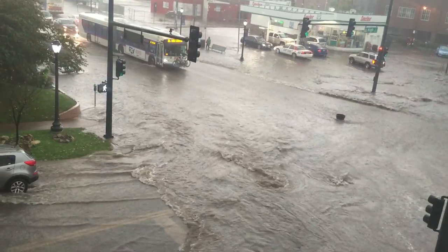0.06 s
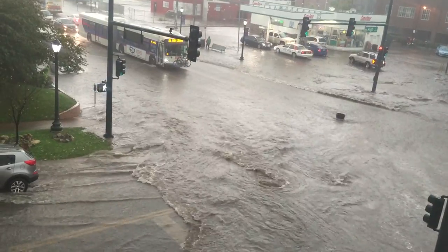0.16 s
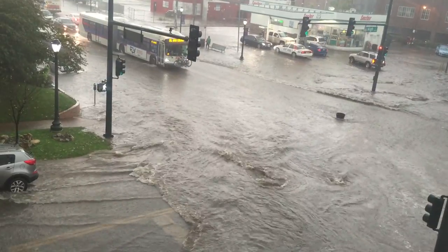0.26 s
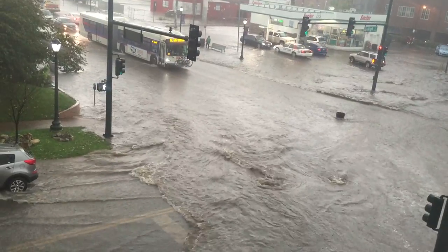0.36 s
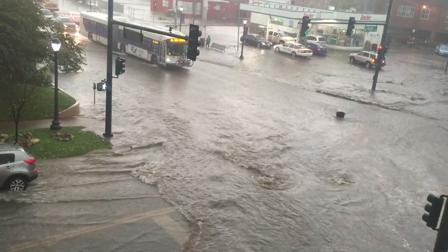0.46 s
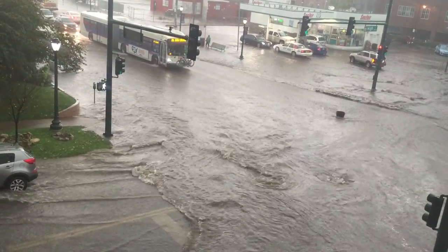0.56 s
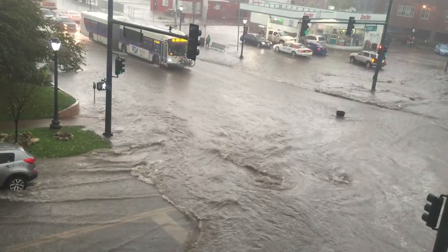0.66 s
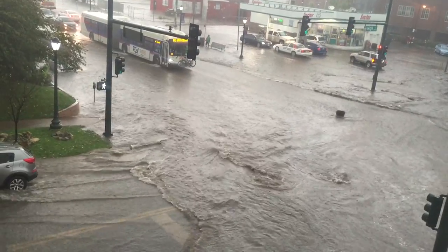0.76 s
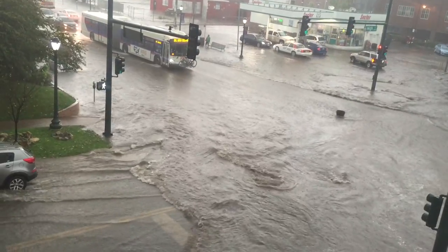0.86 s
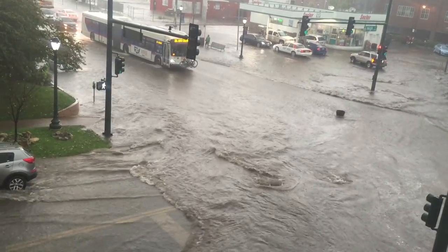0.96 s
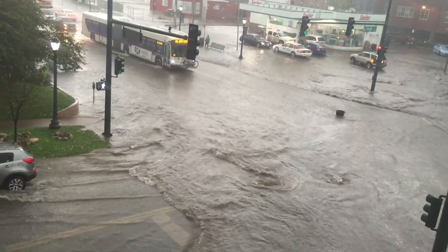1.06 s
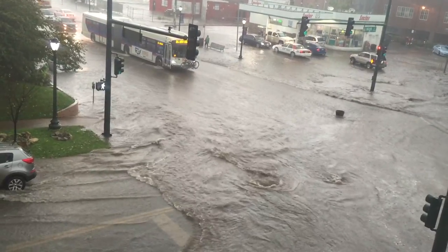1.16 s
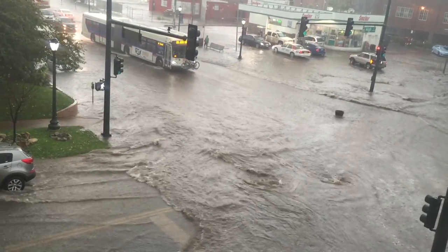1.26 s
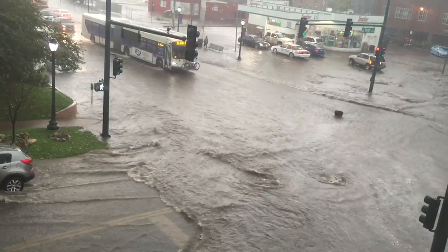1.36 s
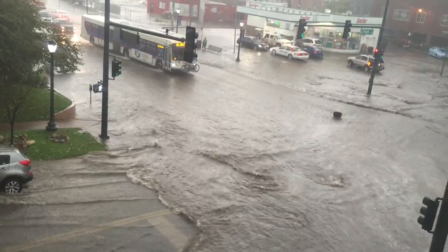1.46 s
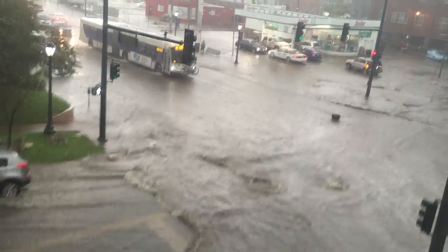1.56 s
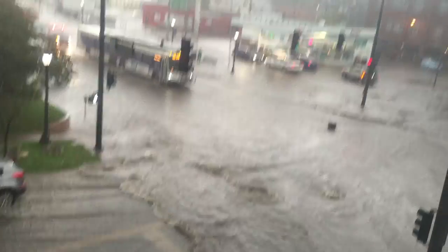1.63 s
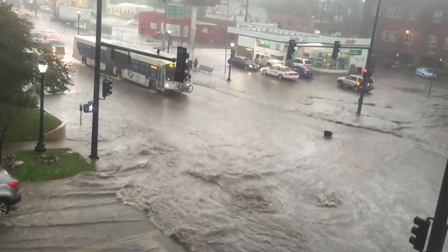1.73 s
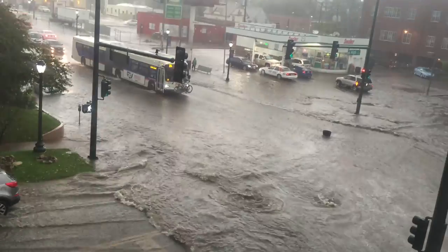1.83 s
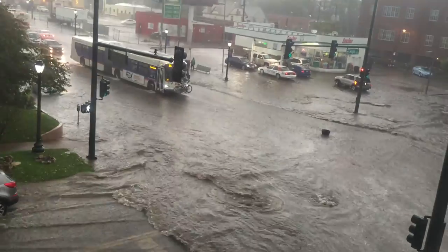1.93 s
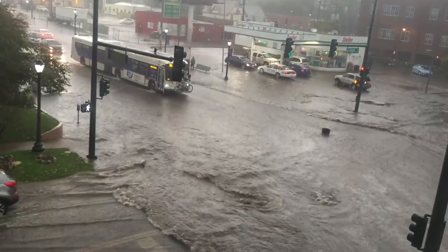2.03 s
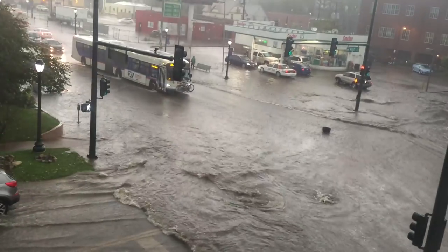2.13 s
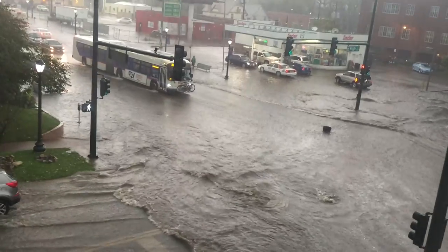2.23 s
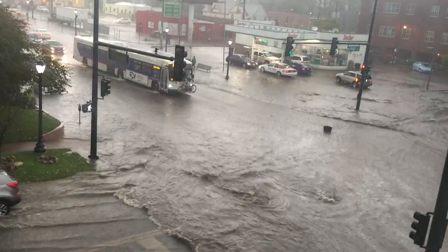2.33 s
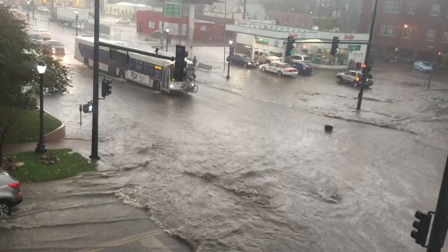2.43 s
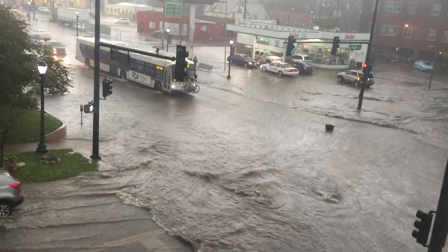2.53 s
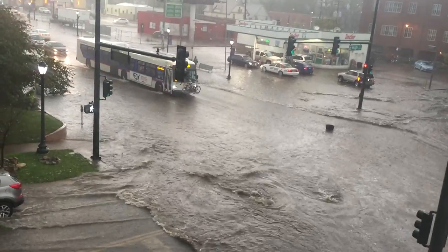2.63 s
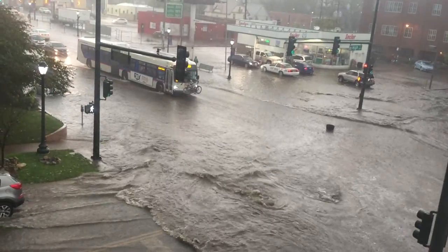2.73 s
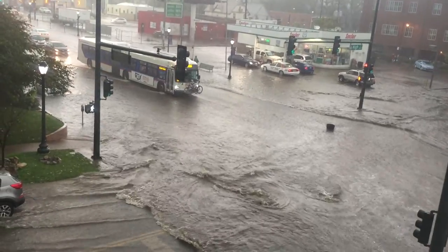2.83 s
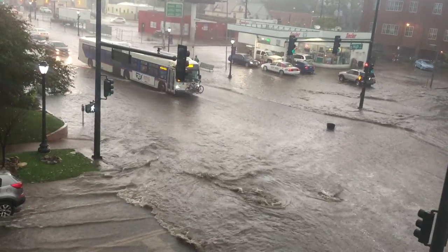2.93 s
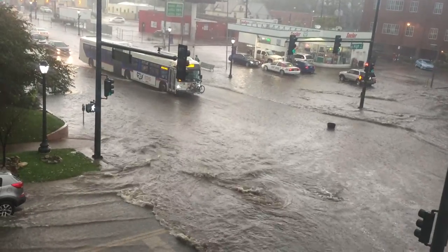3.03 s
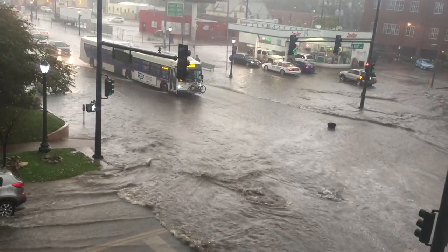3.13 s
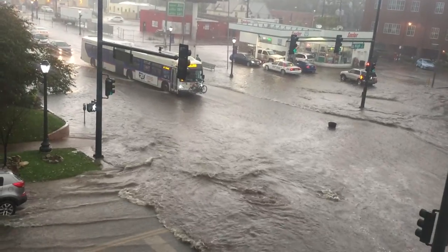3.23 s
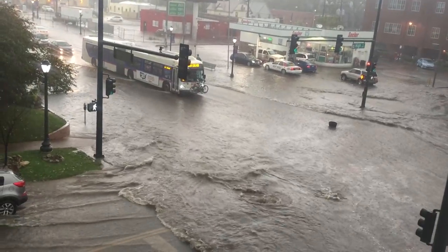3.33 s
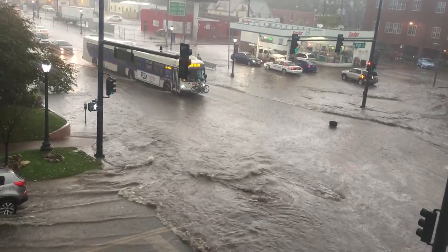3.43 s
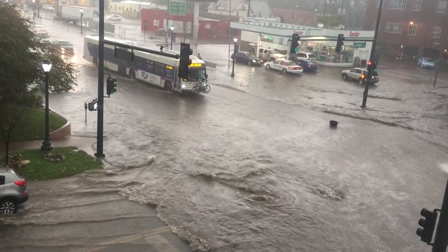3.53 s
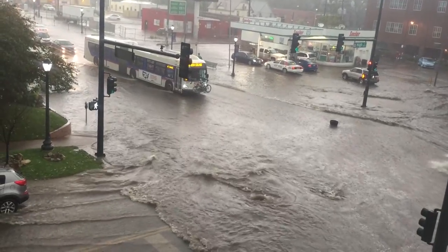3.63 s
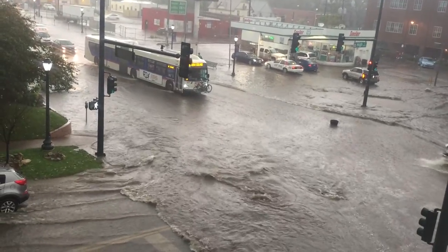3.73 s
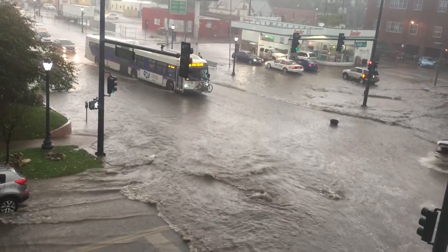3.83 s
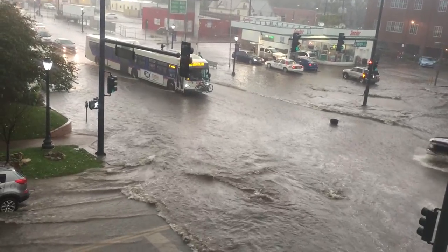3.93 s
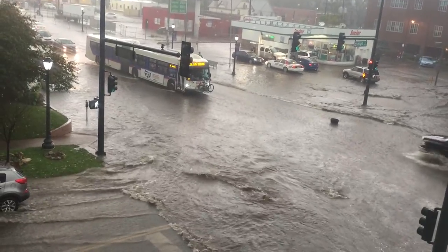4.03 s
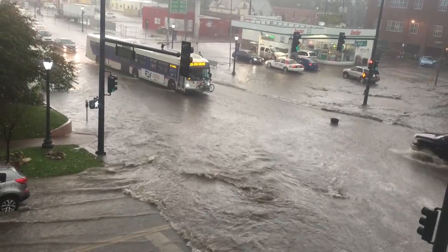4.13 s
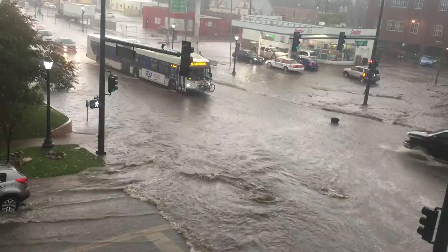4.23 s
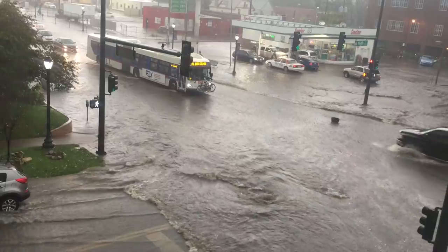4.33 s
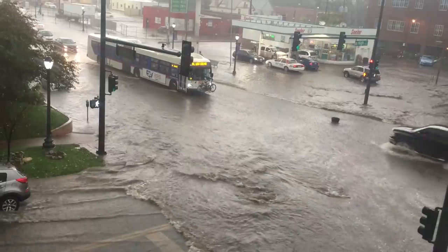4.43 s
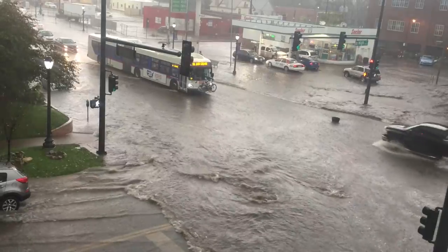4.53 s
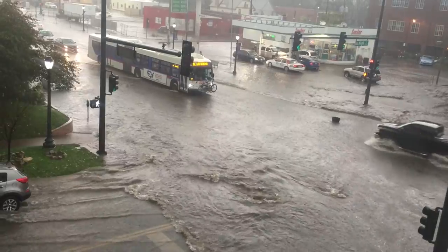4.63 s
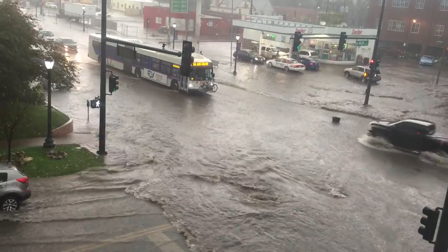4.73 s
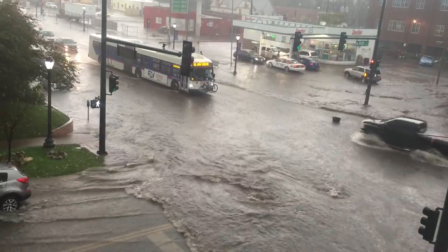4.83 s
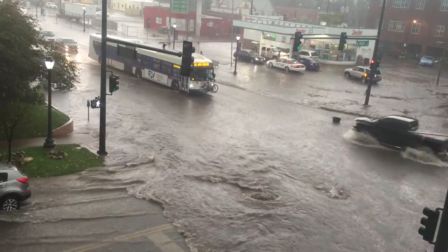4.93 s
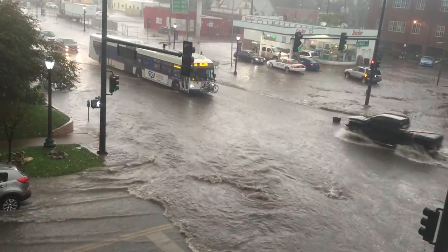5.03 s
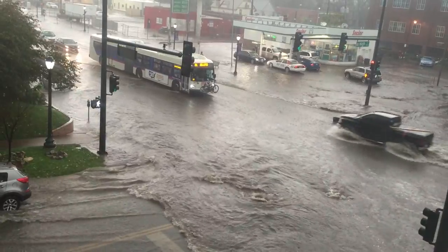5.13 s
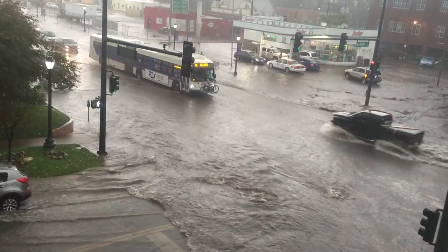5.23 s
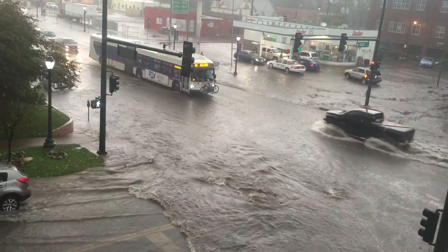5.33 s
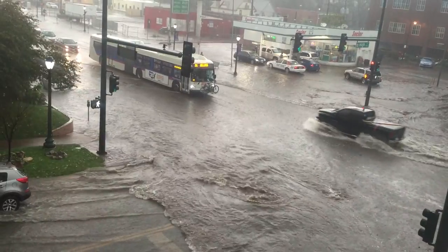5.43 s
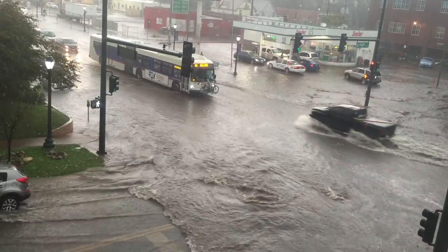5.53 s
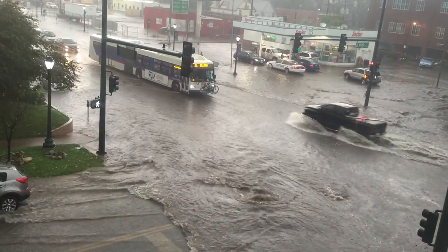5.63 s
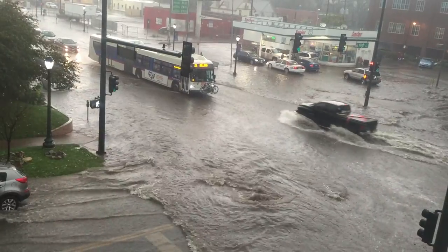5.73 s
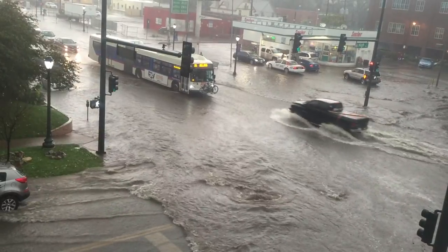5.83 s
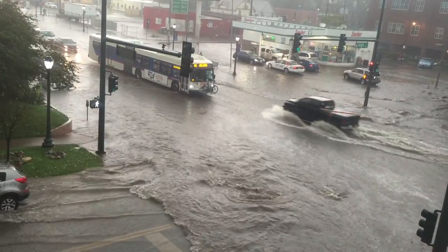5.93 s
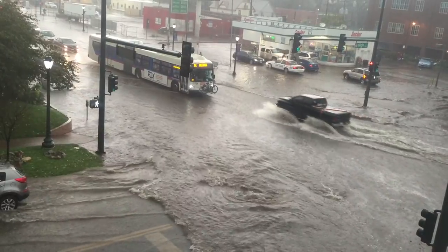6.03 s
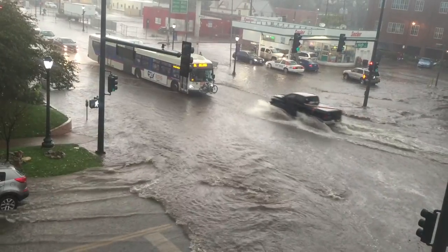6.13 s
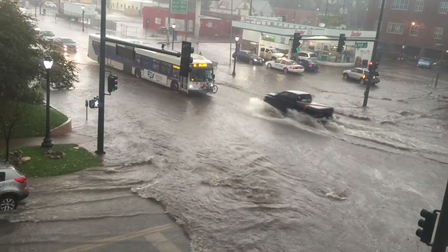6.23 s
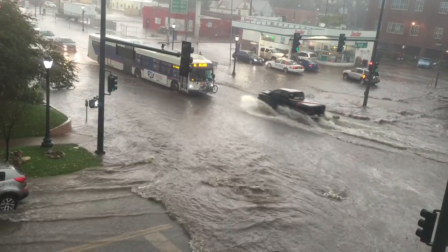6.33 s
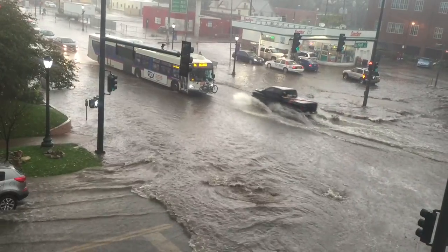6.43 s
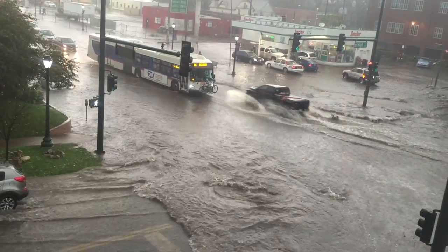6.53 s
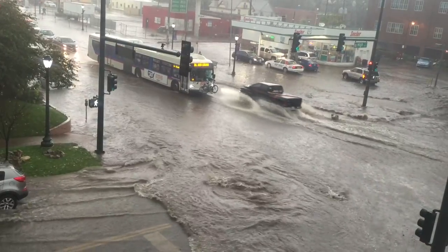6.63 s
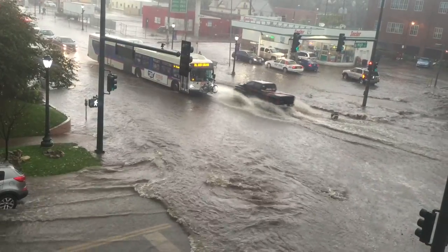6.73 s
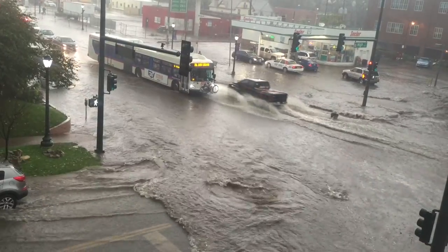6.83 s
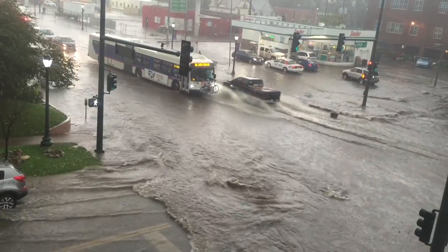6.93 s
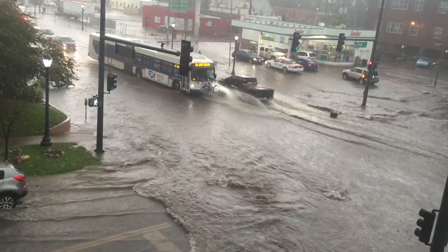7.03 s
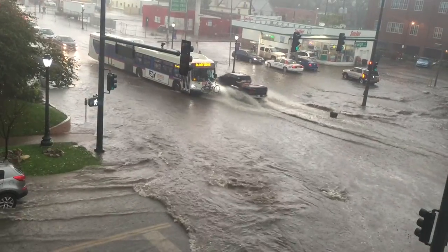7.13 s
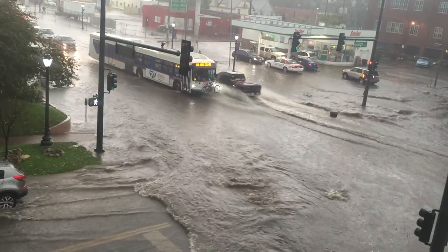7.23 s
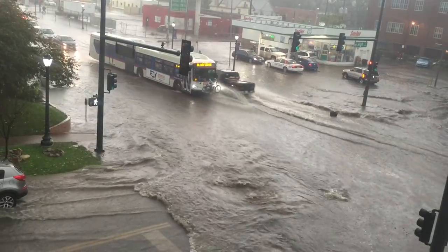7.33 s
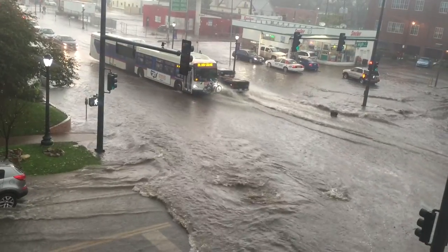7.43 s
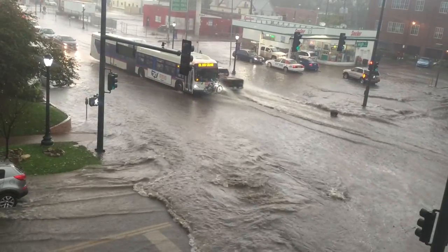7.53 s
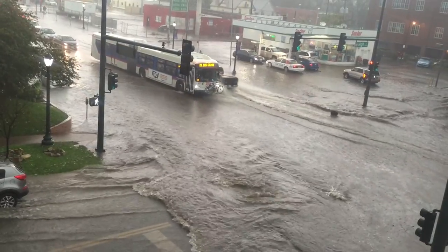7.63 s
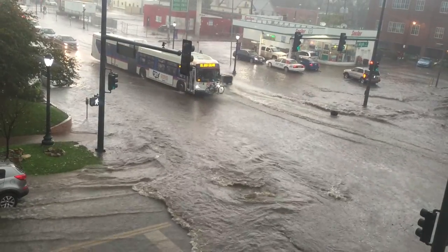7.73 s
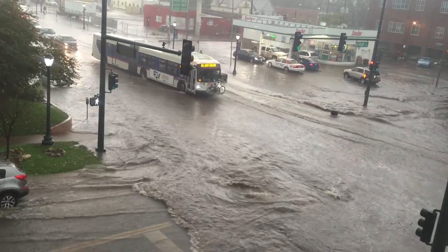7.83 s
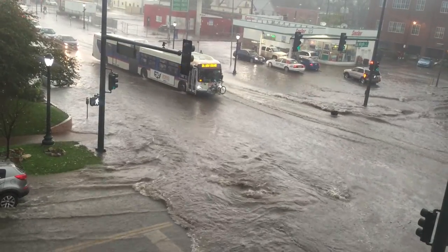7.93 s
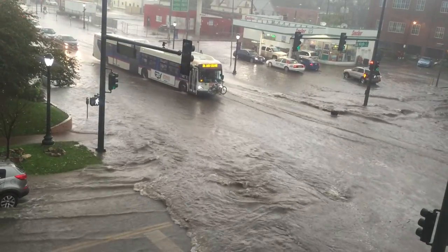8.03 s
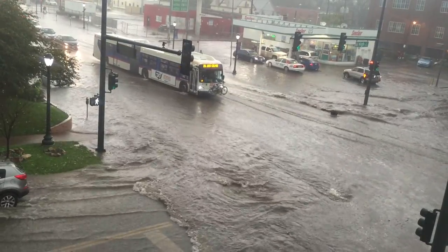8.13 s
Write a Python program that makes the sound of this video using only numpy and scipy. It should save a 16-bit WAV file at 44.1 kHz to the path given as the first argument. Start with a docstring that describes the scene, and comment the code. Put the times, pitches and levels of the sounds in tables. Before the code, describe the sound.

From a sheltered window above a flooded crossing, one microphone with a slightly boxy colour picks up steady rushing water, softer fine rain hiss and uneven low traffic rumble throughout. A pickup's deep, uneven eight-cylinder exhaust emerges around 0.6 s, rises slowly in pitch to about 2.1 s, wavering and burbling, then falls and almost disappears between 3 and 4 s. Here water, rumble and small high drips near 3-3.8 s are clearer. The engine returns at about 4.5 s, climbs steadily, jumps in pitch near 6 s and holds a fuller, faintly raspy roar until 7 s, with soft bubbling spray swelling around 5.7 s and fading. A lower plop lands at 7.0 s. Pitch drops sharply near 7.4 s, followed by a short growl that fades by 8 s. Sparse ticks, a distant idling bus and a very faint thin whine sit behind.

```python
"""An eight-cylinder pickup revs up twice on a flooded crossing in heavy rain, taken from a sheltered window above.
Its exhaust is sines on multiples of the engine cycle, with a band of noise for rasp; its spray is ringing bubbles.
Close by, short noise bursts tick and decaying sines plop; near rain is hiss grained with narrow bands of noise.
Running water is hiss mixed with bubbles. Further off a bus idles on two low sines, a thin whine hangs in the hiss,
and traffic rumbles as lumpy noise. A single microphone in the window recess colours it all."""
import sys
import numpy as np
from scipy import signal
from scipy.fft import rfft, irfft, next_fast_len
from scipy.io import wavfile

SR = 44100
rng = np.random.default_rng(int(sys.argv[2]) if len(sys.argv) > 2 else 0)


def log_audio(samples):
    """Write samples as a 16-bit WAV file to the path given in sys.argv[1]."""
    # one column per channel
    frames = np.atleast_2d(samples).T
    # limit to full scale, then quantise
    limited = np.clip(frames, -1, 1)
    pcm = np.round(limited * 32767).astype(np.int16)
    wavfile.write(sys.argv[1], SR, pcm)


N = 360738   # samples

# All source levels are those ahead of the recess and microphone colour.
# Pickup engine speed: time_s, engine cycles per s
ENGINE_SPEED = [(0, 14.3), (.4, 14.4), (.6, 14.75), (1.0, 14.8), (1.4, 15.85), (1.75, 16.1), (2.1, 16.65),
                (2.7, 16.25), (3.3, 14.3), (4.0, 12.9), (4.45, 13.1), (4.7, 15.0), (4.9, 15.5), (5.1, 15.8),
                (5.65, 16.35), (6.03, 18.4), (6.33, 18.9), (6.6, 18.3), (6.9, 18.45), (7.1, 17.95),
                (7.33, 17.5), (7.48, 15.2), (7.7, 15.8), (8.18, 15.7)]
# Strong exhaust tones: time_s, order_8_db (the firing), order_5_db, order_7_db, before dips and flutter
STRONG_TONES = [(0, -39.5, -46, -43), (.3, -54, -48, -58), (.42, -39.5, -50, -34), (.66, -29.5, -44, -49),
                (1.15, -28, -55, -41), (1.45, -29.5, -50, -40), (1.68, -29, -41, -41),
                (1.83, -41, -38.5, -62), (2.1, -38.5, -45, -36), (2.3, -43, -42, -36.5),
                (2.6, -37.5, -44, -43), (2.95, -67, -45, -52), (3.9, -50, -54, -56), (4.2, -41, -54, -49),
                (4.45, -37.5, -49, -38), (4.62, -28.5, -59, -40), (4.8, -31, -41, -40),
                (5.03, -35.5, -36.5, -36), (5.4, -28.5, -34.5, -39), (5.73, -30.5, -34.5, -44),
                (5.95, -39, -28, -38), (6.25, -45, -30, -39.5), (6.5, -36.5, -29.5, -46),
                (6.8, -42, -26.5, -63), (7.0, -38, -30.5, -39), (7.15, -32.5, -37.5, -41),
                (7.27, -46, -30, -40), (7.42, -34, -35, -47), (7.52, -27, -38, -38), (7.7, -31, -39, -42),
                (7.9, -53, -45, -46.5), (8.05, -41.5, -50, -59), (8.18, -59, -46, -55)]
# Brief dips of those tones: centre_s, order_8_loss_db, order_5_loss_db, order_7_loss_db
TONE_DIPS = [(.82, 2, 6, 0), (1.25, 18, 6, 0), (5.54, 9, 3, 0), (5.68, 0.5, 10, 0), (6.34, 9, 2, 0),
             (6.48, 2, 4, 0), (7.08, 6, 4, 0), (7.36, 25, 8, 8), (7.62, 26, 0, 0)]
# Weaker engine orders, set by the uneven firing of the two banks: multiples of the cycle rate
WEAK_ORDERS = [4, 6, 9, 10, 11, 12, 13, 14, 15, 16, 17, 18, 20, 21, 23, 24, 26, 28]
# Relative strength of each weaker order: level_db
WEAK_ORDER_DB = [-6.5, -3.5, -3.5, 0, -5, -2.5, 1, -9, -1, 0, -8, 0, -2, -1, -4, -6, 0, 0]
# Drive of the weaker orders into the pipe: time_s, lower_db, middle_db, upper_db
PIPE_DRIVE = [(0, -63, -64, -61), (.7, -51, -49, -54), (1.0, -52.5, -54, -55), (1.3, -43.5, -51, -50.5),
              (1.5, -44.5, -62, -57), (1.7, -50.5, -56, -48.5), (2.0, -40, -49, -52), (2.15, -47, -52, -45),
              (2.27, -43, -42, -55.5), (2.45, -49, -47.5, -50), (2.7, -49, -48, -63),
              (2.9, -55.5, -64, -62), (4.0, -53.5, -60, -77), (4.6, -50, -53, -59), (4.85, -50, -50, -60),
              (5.1, -53, -44.5, -60), (5.3, -54, -58, -62), (5.5, -55, -48, -53), (5.7, -47, -44, -51.5),
              (6.0, -43.5, -44.5, -53.5), (6.35, -45, -43, -52), (6.75, -46.5, -43, -52),
              (7.1, -52, -54, -53), (7.2, -53, -45, -50), (7.35, -50, -43, -64), (7.55, -58, -58, -72),
              (7.7, -55, -44.5, -75), (7.85, -61, -62, -71), (8.18, -56, -51, -54)]
# Exhaust pipe resonances in three groups: centre_hz, width_hz, level_db
LOWER_RESONANCES = [(107, 47.6, 0), (150, 14, -12), (243, 26, -8)]
MIDDLE_RESONANCES = [(214, 17, 0)]
UPPER_RESONANCES = [(329, 30, -2), (438, 26, -18)]
# Momentary swells of single weak orders: centre_s, half_length_s, order, gain_db
ORDER_SWELLS = [(1.5, .08, 21, 9), (1.6, .18, 28, 10), (2.36, .22, 26, 14), (2.28, .1, 13, 4),
                (2.1, .25, 15, 3), (6.3, .1, 17, 11), (6.33, .12, 11, 6), (6.42, .12, 18, 4)]
# Close ticking drops: start_s, level_db of the noise before its band filter
DROP_TICKS = [(0.3137, -59.5), (0.8719, -56), (1.1468, -52), (1.7981, -57), (1.9664, -53), (4.071, -57),
              (4.889, -57), (5.4144, -55), (7.7388, -49), (7.9737, -54)]
# Plops and pings of single drops: start_s, peak_db, pitch_hz, rise_s
DROP_PLOPS = [(.515, -57, 5240, .003), (.982, -57, 5250, .003), (2.081, -54, 5530, .003),
              (2.790, -56, 5500, .005), (3.055, -54, 2530, .004), (3.140, -52, 2460, .005),
              (3.285, -57, 5300, .003), (3.423, -56, 5690, .003), (3.601, -54, 4210, .003),
              (3.804, -57, 5490, .003), (7.012, -45, 855, .008), (8.069, -66, 7230, .003)]
# Levels of the background layers: time_s, rumble_db, water_db, rain_db
BACKGROUND_LEVELS = [(0, -41, -47.5, -65.5), (.8, -39.5, -48, -67.5), (1.3, -42, -48, -68),
                     (1.7, -40, -49, -68), (2.3, -41, -48, -67), (2.7, -44, -48, -68),
                     (2.9, -45.5, -46.5, -66.5), (3.1, -39, -47, -66.5), (3.5, -44, -46, -65.5),
                     (3.9, -38, -47, -65.5), (4.4, -41.5, -47, -66.5), (4.8, -38.5, -48, -66.5),
                     (5.3, -41.5, -47.5, -67), (5.8, -47, -47.5, -66.5), (6.75, -42.5, -48, -67),
                     (7.2, -37.5, -46.5, -63.5), (7.36, -38, -47, -66.5), (7.55, -36.5, -47.5, -65),
                     (7.75, -39.5, -47.5, -66.5), (7.93, -43, -46.5, -65.5), (8.05, -41, -46.5, -66.5),
                     (8.18, -44, -48.5, -66)]
# Spectrum of rain on near surfaces: frequency_hz, relative density (dB per Hz)
RAIN_SPECTRUM = [(3820, -26), (6500, -7.5), (7830, -7.5), (9330, -2.5), (10300, -6), (11100, -4),
                 (13000, -0.5), (15000, -6.5)]
# Spectrum of running water and far rain: frequency_hz, relative density (dB per Hz)
WATER_SPECTRUM = [(220, -16.5), (380, -2.5), (476, -5), (727, -2), (1030, -5), (1460, -2.5), (1620, 1.5),
                  (1760, -5.5), (2260, -10.5), (2470, -10), (3250, -19), (4120, -14), (4790, -19),
                  (5560, -17), (7500, -41), (9750, -74), (16500, -120)]
# Idling bus further off: time_s, low_tone_db, octave_db, before flutter
BUS_TONES = [(0, -51, -73), (1.3, -52, -64), (1.5, -51, -43), (2.6, -45, -60), (3.1, -48, -63),
             (4.6, -68, -55), (5.4, -44, -68), (7, -51, -48), (7.5, -60, -37), (8.18, -58, -78)]
# Thin whine: time_s, pitch_hz, level_db, octave_db, before flutter
WHINE_TONES = [(0, 736, -75, -58), (.6, 741, -57.5, -63.5), (.9, 742, -61.5, -57.5), (1.3, 743, -64, -61),
               (1.8, 743, -61, -63), (3, 742, -62.5, -75), (4, 748, -65, -79), (5.3, 746, -64, -63),
               (5.75, 748, -57, -64), (6.15, 745.7, -56, -60), (6.3, 744, -64, -61), (6.5, 747, -56, -65),
               (6.8, 742, -59, -67), (7.4, 748.5, -61.5, -63), (8.18, 758, -60, -66)]
# Spectrum of traffic rumble: frequency_hz, relative density (dB per Hz)
RUMBLE_SPECTRUM = [(15, -64), (27, -19), (40, -4.5), (62, -11.5), (80, 2.5), (110, 1.5), (150, 0),
                   (185, -5.5), (225, -10.5), (265, -18.5), (290, -15.5), (340, -14.5), (400, -26.5),
                   (480, -32.5), (700, -61)]
# Resonances and dips of the window recess and microphone: centre_hz, width_hz, gain_db
RECESS_COLOUR = [(614, 107, 5.5), (1796, 88, 7.5), (2503, 150, 8.5), (2980, 76, 7), (1605, 126, -11),
                 (3550, 190, -0.5), (4716, 500, -8.5), (10300, 460, -5.5)]

DIP_S = 0.057   # half length of a dip, to 1/e of its depth
# The further a strong tone is below the steady level, the more it flutters, between two limits
STEADY_DB, FLUTTER_PER_DB, FLUTTER_LEAST_DB, FLUTTER_MOST_DB = -33, 0.3, 1.6, 3.5
ORDER_WAVER_DB, ORDER_WAVER_HZ = 3.4, 9   # level waver of the weaker orders
ORDER_BLUR = 0.003                        # pitch blur, as a fraction
RASP_S, RASP_HALF_S, RASP_DB, RASP_HZ, RASP_WIDTH_HZ = 6.19, 0.4, -62, 618, 52
WAKE_S, WAKE_RISE_S, WAKE_FALL_S, WAKE_DB = 5.72, 0.62, 0.98, -55.5
WAKE_LOW_HZ, WAKE_HIGH_HZ = 1010, 2320
BUS_HZ = 59
CUTOFF_HZ = 15240


def strong_tones(cycle_hz):
    """The firing tone and two strong orders are sines at fixed multiples of the cycle rate."""
    t = np.arange(N) / SR
    levels = np.array(in_time(STRONG_TONES))
    for s, *lost_db in TONE_DIPS:
        levels -= np.outer(lost_db, np.exp(-np.square((t - s) / DIP_S)))
    firing_db, fifth_db, seventh_db = levels
    out = np.zeros(N)
    for order, db in ((5, fifth_db), (7, seventh_db), (8, firing_db)):
        flutter_db = np.clip(FLUTTER_PER_DB * (STEADY_DB - db), FLUTTER_LEAST_DB, FLUTTER_MOST_DB)
        out += from_db(db + flutter_db * drift(5.4)) * sine(order * cycle_hz)
    return out


def weak_orders(cycle_hz):
    """Weaker orders waver, and swell as their pitch crosses an exhaust pipe resonance."""
    t = np.arange(N) / SR
    lower, middle, upper = from_db(in_time(PIPE_DRIVE))
    out = np.zeros(N)
    for order, order_db in zip(WEAK_ORDERS, WEAK_ORDER_DB):
        hz = order * cycle_hz
        pipe = lower * resonances(LOWER_RESONANCES, hz)
        pipe += middle * resonances(MIDDLE_RESONANCES, hz)
        pipe += upper * resonances(UPPER_RESONANCES, hz)
        db = order_db + ORDER_WAVER_DB * drift(ORDER_WAVER_HZ)
        for s, half_s, swelling_order, gain_db in ORDER_SWELLS:
            if swelling_order == order:
                db = db + gain_db * np.exp(-np.square((t - s) / half_s))
        blurred_hz = hz * (1 + ORDER_BLUR * drift(4.86))   # each order's pitch blurs slightly
        out += pipe * from_db(db) * sine(blurred_hz)
    return out


def resonances(modes, hz):
    """Gain of steep-sided resonances at a moving pitch."""
    gain = 0
    for centre_hz, width_hz, db in modes:
        offset = (hz - centre_hz) / (width_hz / 2)
        gain = gain + from_db(db) / np.sqrt(1 + offset ** 4)
    return gain


def pickup():
    """All engine orders ride on one moving cycle rate, so they rise and fall together in pitch."""
    cycle_hz, = in_time(ENGINE_SPEED)
    return strong_tones(cycle_hz) + weak_orders(cycle_hz)


def rasp():
    """Noise in one exhaust resonance swells at the top of the revs."""
    swell = np.exp(-np.square((np.arange(N) / SR - RASP_S) / RASP_HALF_S))
    edges_hz = [RASP_HZ - RASP_WIDTH_HZ / 2, RASP_HZ + RASP_WIDTH_HZ / 2]
    band = signal.butter(2, edges_hz, "band", fs=SR, output="sos")
    noise = rms_one(signal.sosfilt(band, rng.standard_normal(N)))
    return from_db(RASP_DB) * swell * noise


def wake():
    """Spray thrown up by the pickup: dense splashes of ringing bubbles swell and fade."""
    late_s = np.arange(N) / SR - WAKE_S
    swell = np.exp(-np.square(late_s / np.where(late_s < 0, WAKE_RISE_S, WAKE_FALL_S)))
    spray = struck_resonators(2500, WAKE_LOW_HZ, WAKE_HIGH_HZ, cycles=42.0, count=12)
    return from_db(WAKE_DB) * swell * spray


def drops():
    """Close drops: ticks are bright noise bursts of a few ms, plops are short rings."""
    out, t = np.zeros(N), np.arange(round(0.08 * SR)) / SR
    bright = signal.butter(2, [9000, 14500], "band", fs=SR, output="sos")
    for s, db in DROP_TICKS:
        i = round(s * SR)
        burst = signal.sosfilt(bright, rng.standard_normal(len(t)))
        out[i:i + len(t)] += from_db(db) * burst * np.exp(-t / 0.003)
    for s, db, hz, rise_s in DROP_PLOPS:
        i = round(s * SR)
        envelope = t / rise_s * np.exp(1 - t / rise_s)   # reaches 1 after rise_s
        out[i:i + len(t)] += from_db(db) * np.sin(2 * np.pi * hz * t) * envelope
    return out


def near_rain(level_db):
    """Rain on near surfaces: hiss grained with narrow bands of noise."""
    grain = struck_resonators(500, 9300.0, 15000.0, cycles=65.0, count=8)
    hiss = rng.standard_normal(N) + 0.18 * grain
    hiss = patchy(hiss, 4400.0, count=4, shared_db=-0.4, own_db=1.46, rate=32)
    return from_db(level_db) * shaped(hiss, RAIN_SPECTRUM)


def running_water(level_db):
    """Running water and far rain: hiss mixed with ringing bubbles, mostly lower ones."""
    bubbles = struck_resonators(1500, 903.7, 6970.0, cycles=160.0, count=44)
    water = rng.standard_normal(N) + 0.31 * bubbles
    water = patchy(water, 324.4, count=10, shared_db=-0.42, own_db=1.62, rate=13.7)
    return from_db(level_db) * shaped(water, WATER_SPECTRUM)   # the spectrum favours the lower bubbles


def struck_resonators(per_s, low_hz, high_hz, cycles, count):
    """Random impacts strike resonators, spread between two limits, that fall 60 dB in some cycles; rms 1."""
    hits = spatter(per_s, spread_db=2.0)
    dealt = rng.integers(0, count, N)   # which resonator each impact strikes
    out = np.zeros(N)
    for k, hz in enumerate(np.geomspace(low_hz, high_hz, count)):
        r, w = from_db(-60 * hz / (cycles * SR)), 2 * np.pi * hz / SR
        band = signal.lfilter([0, 1], [1, -2 * r * np.cos(w), r * r], hits * (dealt == k) + 1e-18)
        out += rms_one(band) * np.sqrt(hz)
    return rms_one(out)


def spatter(per_s, spread_db):
    """Random impacts of uneven size and either sign; rms 1."""
    sizes = from_db(spread_db * np.minimum(rng.exponential(1, N), 5)) * rng.choice([-1, 1], N)
    return rms_one(sizes * (rng.random(N) < per_s / SR))


def bus():
    """Low tones of an idling diesel, a fundamental and its octave, come and go further off."""
    low_db, octave_db = in_time(BUS_TONES)
    hz = BUS_HZ * (1 + 0.015 * drift(5.8))
    low = from_db(low_db + 2.9 * drift(10.0)) * sine(hz)
    octave = from_db(octave_db + 0.47 * drift(3.3)) * sine(2 * hz)
    return low + octave


def whine():
    """A thin tone and its octave, slightly unsteady in pitch and level."""
    hz, db, octave_db = in_time(WHINE_TONES)
    hz = hz * (1 + 0.001 * drift(6.0))
    tone = from_db(db + 3.2 * drift(14.0)) * sine(hz)
    octave = from_db(octave_db + 3.3 * drift(6.9)) * sine(2 * hz)
    return tone + octave


def traffic_rumble(level_db):
    """Traffic rumble: low noise whose bands swell unevenly."""
    noise = rng.standard_normal(N)
    lumpy = patchy(noise, 26.5, count=9, shared_db=-0.5, own_db=2.5, rate=5.5)
    return from_db(level_db) * shaped(lumpy, RUMBLE_SPECTRUM)


def from_db(db):
    """Amplitude ratio of a level in dB."""
    return 10 ** (np.asarray(db) / 20)


def rms_one(x):
    """Scales x to rms 1."""
    return x / np.sqrt(np.mean(x ** 2) + 1e-20)


def in_time(rows):
    """Draws straight lines between the rows of a table whose first column is time_s."""
    s, *columns = np.transpose(rows)
    return [np.interp(np.arange(N) / SR, s, column) for column in columns]


def drift(rate):
    """Slow chance: noise at every 40th sample through a double one-pole low-pass at rate Hz; rms 1."""
    r = np.exp(-80 * np.pi * rate / SR)
    noise = rng.standard_normal(N // 40 + 2002)
    slow = signal.lfilter([1], [1, -2 * r, r * r], noise)[2000:]   # drop the filter's settling
    return np.interp(np.arange(N) / 40, np.arange(len(slow)), rms_one(slow))


def sine(hz):
    """A sine of rms 1 on a pitch curve, from a chance phase."""
    return np.sqrt(2) * np.sin(2 * np.pi * (np.cumsum(hz) / SR + rng.random()))


def filtered(x, db_at):
    """Weights the spectrum of x by a dB function of Hz."""
    size = next_fast_len(N)
    hz = np.maximum(np.arange(size // 2 + 1) * SR / size, 1)
    return irfft(rfft(x, size) * from_db(db_at(hz)), size)[:N]


def shaped(x, spectrum):
    """Colours x by a spectrum table, interpolated over log frequency; rms 1."""
    hz, db = np.transpose(spectrum)
    return rms_one(filtered(x, lambda at: np.interp(np.log(at), np.log(hz), db)))


def patchy(x, low_hz, count, shared_db, own_db, rate):
    """Splits x into half-octave bands that swell partly together, partly alone."""
    edges = low_hz * 2 ** (np.arange(count + 1) / 2)
    together = drift(rate)
    out = np.zeros(N)
    for pair in zip(edges, edges[1:]):
        band = signal.sosfilt(signal.butter(1, pair, "band", fs=SR, output="sos"), x)
        out += band * from_db(shared_db * together + own_db * drift(rate))
    return out


def scene():
    """Everything sums at one microphone."""
    rumble_db, water_db, rain_db = in_time(BACKGROUND_LEVELS)
    crossing = pickup() + rasp() + wake()
    rain_and_water = drops() + near_rain(rain_db) + running_water(water_db)
    distance = bus() + whine() + traffic_rumble(rumble_db)
    return (crossing + rain_and_water + distance)[None]


def recess_db(at_hz):
    """Summed peaks and dips in dB of the window recess and the microphone."""
    return sum(db / (1 + ((at_hz - hz) / (width_hz / 2)) ** 2) for hz, width_hz, db in RECESS_COLOUR)


def record(dry):
    """The recess and microphone colour the sound, then a steep low-pass cuts the top."""
    coloured = filtered(dry[0], recess_db)
    low_pass = signal.ellip(11, 0.5, 56, CUTOFF_HZ, fs=SR, output="sos")   # 0.5 dB ripple, 56 dB stop
    return signal.sosfilt(low_pass, coloured)[None]


dry = scene()
out = record(dry)
log_audio(out)
```